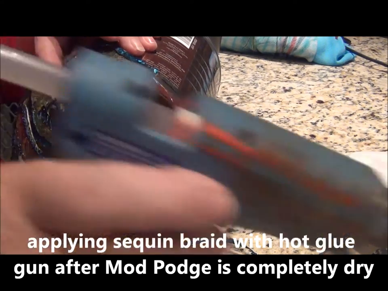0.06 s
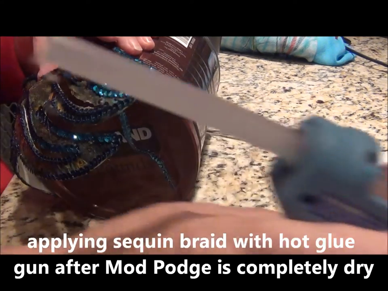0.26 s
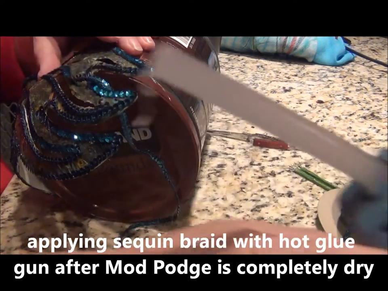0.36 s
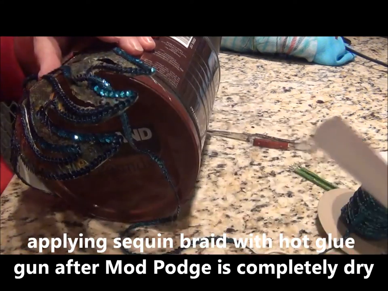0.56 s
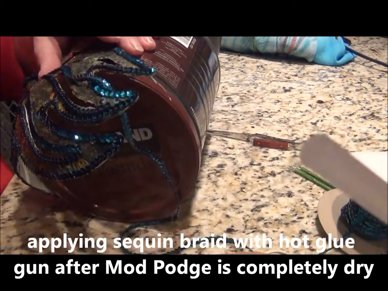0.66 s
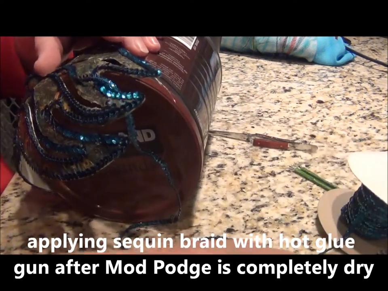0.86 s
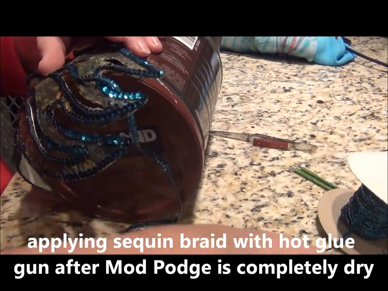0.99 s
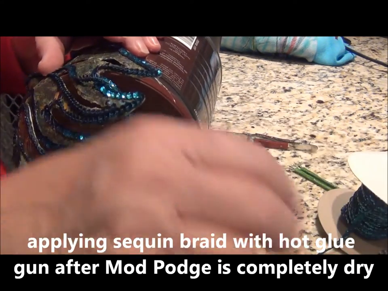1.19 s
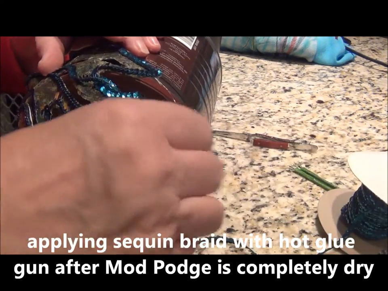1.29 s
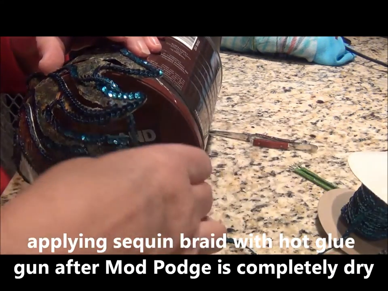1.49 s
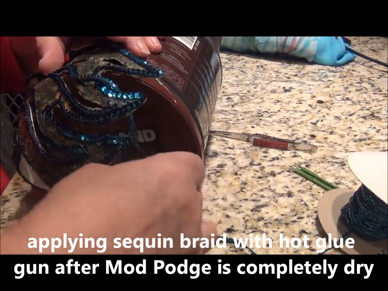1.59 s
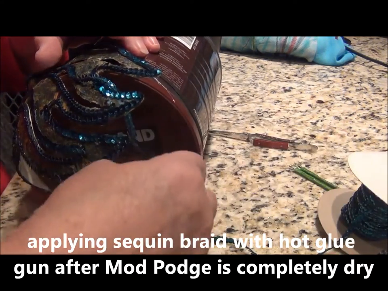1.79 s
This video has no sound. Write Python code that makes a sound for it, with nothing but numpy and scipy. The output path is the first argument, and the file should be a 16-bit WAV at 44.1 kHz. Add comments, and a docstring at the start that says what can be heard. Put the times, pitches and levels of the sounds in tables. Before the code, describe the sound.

A plastic glue gun is put down on a stone counter, close by. It clacks lightly in the hand around 0.3 seconds, lands with one sharp, loud knock at 0.5 and slides briefly. A small metallic tick follows, then a shifted craft tub gives a quick cluster of softer knocks from 0.9 to 1.0. Afterwards only quiet room hiss remains, with a faint tick near 1.8.

```python
"""In a quiet kitchen, a plastic glue gun clacks in the hand, lands hard on a stone counter and slides.
A craft tub is then shifted and knocks on the counter, among small ticks and rubs. Each impact excites
a short burst of dense resonances and a few ringing modes; sliding friction gives grainy noise.
The room reverberates over a steady hiss. The camera's gain control turns down at the hardest blow
and stays down."""
import sys
import numpy as np
from scipy import signal
from scipy.fft import rfft, irfft, next_fast_len
from scipy.io import wavfile
from scipy.ndimage import uniform_filter1d, map_coordinates

SR = 44100
rng = np.random.default_rng(int(sys.argv[2]) if len(sys.argv) > 2 else 0)


def master_out(mix):
    """Clip the mix to full scale and print it as 16-bit PCM to the path in sys.argv[1]."""
    frames = np.transpose(np.atleast_2d(mix))
    ceiling = np.clip(frames, -1, 1)
    pcm = np.round(ceiling * 32767).astype(np.int16)
    wavfile.write(sys.argv[1], SR, pcm)


N = 81585


def amp(db):
    """Amplitude ratio of a level in decibels."""
    return 10 ** (np.asarray(db) / 20)


def unit(x):
    """Normalisation to an rms of 1."""
    return x / np.sqrt(np.mean(x ** 2) + 1e-20)


def along(points, hz):
    """Interpolation of (Hz, value) points on a logarithmic frequency axis."""
    point_hz, values = np.transpose(points)
    return np.interp(np.log(hz + 1), np.log(point_hz + 1), values)


def filtered(x, response):
    """Linear filtering: the spectrum is multiplied by a frequency response."""
    size = next_fast_len(N + SR // 2)
    return irfft(rfft(x, size) * response(np.fft.rfftfreq(size, 1 / SR)), size)[..., :N]


def tone(hz, bass_db, treble_db):
    """Shelving response in dB: bass and treble relative to a flat midrange."""
    return along([(400, bass_db), (1000, 0), (2800, 0), (6000, treble_db)], hz)


def add(track, start_s, sound):
    """Superposition of a sound on a track."""
    part = track[round(start_s * SR):][:len(sound)]
    part += sound[:len(part)]


CONTACT_HOLD = 0.133  # share of a contact's t60 (time to fall 60 dB) spent chattering at full strength
CRACK_DB, CRACK_HZ = -4.5, 3470  # the sharp first touch: a high-passed impulse


def strike(colour, t60, modes, size=16384):
    """Impact excitation: a crack and a dying burst, shaped by colour(hz) in dB, plus damped modes."""
    t, hz = np.arange(size) / SR, np.fft.rfftfreq(size, 1 / SR)
    fade = amp(-60 * np.maximum(0, t / t60 - CONTACT_HOLD))
    burst = rng.standard_normal(size) * fade
    for _ in range(4):  # even out the burst's spectrum
        spectrum = rfft(burst)
        burst = irfft(spectrum / (abs(spectrum) + 1e-12)) * np.minimum(1, 10 * fade)
    # a minimum-phase response keeps the attack sharp
    cepstrum = irfft(np.log(amp(colour(hz)) + 1e-6))
    cepstrum[1:size // 2] *= 2
    cepstrum[size // 2 + 1:] = 0
    body_response = np.exp(rfft(cepstrum))
    crack = amp(CRACK_DB) * 1j * hz / (1j * hz + CRACK_HZ)
    sound = unit(irfft((rfft(burst) + crack) * body_response))
    for mode_hz, db, ring_s in modes:
        ring = np.sin(2 * np.pi * mode_hz * t) * amp(-60 * t / ring_s) * (1 - np.exp(-t * mode_hz))
        sound = sound + amp(db + rng.normal()) * unit(ring)
    return unit(sound) * np.sqrt(.01 * SR / size)  # the energy of 10 ms at rms 1


def blows(contacts, body, modes):
    """Repeated impacts on one body: the point of excitation colours each blow."""
    out = np.zeros(N)
    for start_s, db, bass_db, treble_db, t60 in contacts:
        colour = lambda hz: along(body, hz) + tone(hz, bass_db, treble_db)
        add(out, start_s, amp(db) * strike(colour, t60, modes))
    return out


# Blows on the stone. Each row: start in seconds, level, bass and treble in dB, t60 in seconds.
LANDING_BLOWS = [(.4931, -8.5, -6, 3, 0.019), (.5405, -21.5, 18, -6, 0.033), (.5605, -34, 26.5, 9, 0.028)]
# Envelope of the dense resonances. Each row: frequency in Hz, relative level in dB.
LANDING_BODY = [(280, -29), (650, -4), (1050, 1.5), (1700, -7.5), (2200, -4), (4100, -6), (8300, -29.5),
                (11000, -24), (16000, -48)]
# Ringing modes. Each row: frequency in Hz, relative level in dB, t60 in seconds.
LANDING_MODES = [(406.4, -21.5, 0.22), (850, -18, 0.34), (1026, -6.5, 0.021), (1212, -8, 0.028),
                 (2040, -7, 0.064), (2740, -6, 0.035), (3522, -13.5, 0.045)]


def gun_landing():
    """Impact on stone: one hard blow and two weaker contacts excite the glue gun's modes."""
    return blows(LANDING_BLOWS, LANDING_BODY, LANDING_MODES)


# Clacks in the hand. Each row: start in seconds, level, bass and treble in dB, t60 in seconds.
GUN_CLACKS = [(.2308, -19.5, 1.5, 4, 0.025), (.2788, -26, -8, 15, 0.021), (.3148, -33.5, 4, 21.5, .012),
              (.3541, -30.5, -9, 19, 0.015)]
# Envelope of the gun's dense resonances. Each row: frequency in Hz, relative level in dB.
GUN_BODY = [(60, -18.5), (180, -9.5), (270, -5.5), (600, -4.5), (1100, -1), (2500, 4.5), (4000, -7),
            (6500, -23.5), (16000, -36.5)]
# Ringing modes. Each row: frequency in Hz, relative level in dB, t60 in seconds.
GUN_MODES = [(265.3, -15.5, 0.05), (396.7, -13, 0.31), (972, -14, 0.065), (2365, -14.5, 0.075)]


def gun_clacks():
    """Damped free vibration: the hand-held plastic gun rings briefly after each clack."""
    return blows(GUN_CLACKS, GUN_BODY, GUN_MODES)


# Knocks of the tub. Each row: start in seconds, level, bass and treble in dB, t60 in seconds.
TUB_KNOCKS = [(.8913, -25.5, -9, 10, .014), (.8932, -21, 4, -2, 0.043), (.9147, -31, -2, -3, 0.018),
              (.9232, -22, 10, -15, 0.017), (.9461, -18.5, 8.5, 16.5, .005), (.9487, -18, -9, -3, 0.013),
              (.974, -31.5, -4, -11, .04)]
# Envelope of the tub's dense resonances. Each row: frequency in Hz, relative level in dB.
TUB_BODY = [(220, -15.5), (440, -2), (950, 1.5), (1170, -4), (1600, 1.5), (2400, -2.5), (3600, -10.5),
            (16000, -50.5)]
# Ringing modes. Each row: frequency in Hz, relative level in dB, t60 in seconds.
TUB_MODES = [(414.5, -14.5, 0.12), (928, -4.5, 0.23), (1046, -10, 0.03)]


def tub_knocks():
    """Superposed decays: the shifted tub knocks again before its modes have died away."""
    return blows(TUB_KNOCKS, TUB_BODY, TUB_MODES)


# The closing tap. Its row: start in seconds, level, bass and treble in dB, t60 in seconds.
LAST_TAP = [(1.0283, -21.5, 0, 0, 0.02)]
# Envelope of the tap's dense resonances. Each row: frequency in Hz, relative level in dB.
TAP_BODY = [(290, -16), (480, -0.5), (1500, 0), (3600, -1.5), (4500, -14.5), (9000, -36)]
# Ringing modes. Each row: frequency in Hz, relative level in dB, t60 in seconds.
TAP_MODES = [(1002, -10.5, 0.1), (1287, -10.5, 0.18), (3490, -27, 0.035)]


def last_tap():
    """Modal decay: a single tap after the knocks leaves three modes ringing."""
    return blows(LAST_TAP, TAP_BODY, TAP_MODES)


# Light ticks. Each row: start in seconds, level in dB, pitch in Hz, width in octaves, t60 in seconds.
TICKS = [(.0845, -43, 12600, 0.23, 0.022), (0.2784, -32.5, 14000, 0.49, 0.028),
         (0.3684, -39.5, 12900, 0.57, .035), (0.8223, -36.5, 11400, .23, 0.0089),
         (0.8566, -27, 7600, 0.46, 0.035), (1.8422, -36.5, 6700, 0.62, 0.0055)]
# Response of what the ticks shake. Each row: frequency in Hz, relative level in dB.
TICK_BODY = [(300, -19), (2000, -2.5), (16000, -18)]


def ticks():
    """Treble resonance: light high clicks, including the bright edge of the gun's second clack."""
    out = np.zeros(N)
    for start_s, db, pitch_hz, octaves, t60 in TICKS:
        peak = lambda hz: np.exp(-.5 * (np.log2((hz + 1) / pitch_hz) / octaves) ** 2)
        colour = lambda hz: 20 * np.log10(amp(along(TICK_BODY, hz)) + peak(hz))
        add(out, start_s, amp(db) * strike(colour, t60, modes=[]))
    return out


# Thin metal rings. Each row: start in seconds, level in dB, frequency in Hz, t60 in seconds.
PINGS = [(.3695, -40, 12450, 0.071), (.3695, -35, 1340, 0.04), (.8567, -34.5, 2310, 0.21),
         (.8567, -42, 781, 0.18)]


def pings():
    """Exponential decay: two of the ticks leave thin metal ringing in damped sinusoids."""
    out, t = np.zeros(N), np.arange(SR // 2) / SR
    for start_s, db, hz, t60 in PINGS:
        add(out, start_s, amp(db - 60 * t / t60) * np.sqrt(2) * np.sin(2 * np.pi * hz * t))
    return out


GRAIN_DB, GRAIN_PER_S = 3.5, 700  # depth and rate of the random flutter in level


def stroke(peak_s, db, rise_s, fall_s, colour):
    """Amplitude modulation: grainy noise swells 20 dB over its rise and sinks 20 dB over its fall."""
    t = np.arange(N) / SR
    noise = unit(filtered(rng.standard_normal(N), lambda hz: amp(colour(hz))))
    grain = map_coordinates(rng.standard_normal(N // 10), [t * GRAIN_PER_S])
    swell = amp(db - 20 * np.maximum((peak_s - t) / rise_s, (t - peak_s) / fall_s))
    return unit(noise * amp(GRAIN_DB * grain)) * swell


# Slides. Each row: peak time in seconds, level in dB, rise and fall in seconds, bass and treble in dB.
RUBS = [(.26, -33.5, 0.053, 0.044, 5, 8), (.542, -27, 0.016, 0.028, 0.5, -2.5),
        (0.741, -30, 0.044, 0.046, -3.5, -8.5), (.936, -29, 0.085, 0.042, -1, -3)]
# Spectrum of the slides. Each row: frequency in Hz, relative level in dB.
RUB_SPECTRUM = [(50, -2), (400, 5.5), (2150, -5.5), (2400, 6.5), (2700, -1.5), (5400, -4), (16000, -13.5)]
# Light brushes. Each row: peak time in seconds, level in dB, rise and fall in seconds, pitch in Hz.
BRUSHES = [(.265, -36.5, 0.058, 0.038, 10600), (.728, -37.5, .1, 0.11, 7000),
           (1.235, -46, .043, 0.12, 12000)]
BRUSH_PEAK_DB, BRUSH_OCTAVES = 10, 0.24


def friction():
    """Sliding friction: rubs on the counter give broadband noise; brushes hiss around one pitch."""
    out = np.zeros(N)
    for peak_s, db, rise_s, fall_s, bass_db, treble_db in RUBS:
        colour = lambda hz: along(RUB_SPECTRUM, hz) + tone(hz, bass_db, treble_db)
        out += stroke(peak_s, db, rise_s, fall_s, colour)
    for peak_s, db, rise_s, fall_s, pitch_hz in BRUSHES:
        colour = lambda hz: BRUSH_PEAK_DB / (1 + (np.log2((hz + 1) / pitch_hz) / BRUSH_OCTAVES) ** 2)
        out += stroke(peak_s, db, rise_s, fall_s, colour)
    return out


SCATTER_S, SCATTER_DB, SCATTER_HZ = 0.0021, -7, 4500


def scattered(x):
    """Scattering: clutter on the counter reflects the treble unequally to the two sides."""
    echoes = unit(rng.standard_normal(round(SCATTER_S * SR)))
    side = signal.fftconvolve(x, echoes / np.sqrt(len(echoes)))[:N]
    side = filtered(side, lambda hz: amp(SCATTER_DB) * hz / np.hypot(hz, SCATTER_HZ))
    return np.array([x + side, x - side])


def panned(x, right_db, shadow_hz=545):
    """Acoustic shadow: the camera body shades the far microphone, while the bass stays centred."""
    side_db = np.array([[-.5], [.5]]) * right_db
    return filtered(x, lambda hz: amp(side_db * hz ** 2 / (hz ** 2 + shadow_hz ** 2)))


def spread(pair, correlation):
    """Partial coherence: two independent noises mix to a given left-right correlation."""
    angle = lambda hz: np.arccos(np.clip(along(correlation, hz), -1, 1)) / 2
    mid, side = filtered(pair, lambda hz: np.array([np.cos(angle(hz)), np.sin(angle(hz))]))
    return np.array([mid + side, mid - side])


# Reverberation time. Each row: frequency in Hz, t60 in seconds.
ROOM_T60 = [(300, 0.26), (1400, 0.45), (2800, 0.35)]
# Strength of the reverberation. Each row: frequency in Hz, gain in dB.
ROOM_DB = [(450, -3), (900, -3), (1500, -4.5), (2800, -7)]
# Coherence of the reverberation. Each row: frequency in Hz, left-right correlation.
ROOM_CORRELATION = [(500, 0.96), (1500, 0.88), (10000, 0.56)]
ROOM_BUILD_S = 0.0013


def reverberation(x):
    """Diffuse field: the kitchen answers with decaying noise that lasts longest in the midrange."""
    hz, t, spectra = signal.stft(rng.standard_normal((2, N)), SR, nperseg=256)
    t60 = along(ROOM_T60, hz)[:, None]
    decay = amp(along(ROOM_DB, hz)[:, None] - 60 * t / t60)
    decay *= np.sqrt(2 * np.log(1000) / (t60 * SR))  # makes the energy independent of t60
    tail = signal.istft(spectra * decay, SR, nperseg=256)[1][:, :N]
    build_up = 1 - np.exp(-(np.arange(N) / SR / ROOM_BUILD_S) ** 2)
    return signal.fftconvolve(x[None], spread(tail, ROOM_CORRELATION) * build_up, axes=1)[:, :N]


# Spectrum of the hiss and rumble. Each row: frequency in Hz, relative level in dB.
FLOOR_SPECTRUM = [(25, -19.5), (90, -6.5), (270, -8.5), (600, -12.5), (1300, -12), (2300, -18),
                  (15500, -23.5)]
# Coherence of that noise. Each row: frequency in Hz, left-right correlation.
FLOOR_CORRELATION = [(200, 0.94), (1500, 0.081), (6000, 0.75)]
# Thin appliance whine. Its row: frequency in Hz, level in dB.
WHINE = [(15735, -64.5)]
FLOOR_DB = -44.5


def background():
    """Stationary noise: hiss and room rumble, with the faint pure tone of an appliance."""
    t = np.arange(N) / SR
    noise = spread(rng.standard_normal((2, N)), FLOOR_CORRELATION)
    hiss = unit(filtered(noise, lambda hz: amp(along(FLOOR_SPECTRUM, hz))))
    whine = sum(amp(db) * np.sqrt(2) * np.sin(2 * np.pi * (hz * t + rng.random())) for hz, db in WHINE)
    return amp(FLOOR_DB) * hiss + whine


def scene():
    """Superposition: each source reaches the microphones directly and through the room."""
    # each source with its right-minus-left treble level in dB
    sources = [(gun_clacks(), 3.3), (gun_landing(), 4.8), (tub_knocks(), 4), (last_tap(), 4),
               (ticks() + pings() + friction(), 2.5)]
    mix = background()
    for sound, right_db in sources:
        mix += panned(scattered(sound), right_db) + panned(reverberation(sound), right_db=1.5)
    return mix


CEILING_DB, LOOK_AHEAD_S, GAIN_RAMP_S = -13.5, 0.029, .01
TOP_HZ = 15900


def record(dry):
    """Automatic gain control: the gain drops just ahead of the loudest blow and holds; then a low-pass."""
    power = uniform_filter1d(np.mean(dry ** 2, axis=0), SR // 100)  # 10 ms average
    level = np.sqrt(abs(power) + 1e-12)
    held = np.minimum.accumulate(np.minimum(1, amp(CEILING_DB) / level))
    ahead = np.interp(np.arange(N) + LOOK_AHEAD_S * SR, np.arange(N), held)
    gain = uniform_filter1d(ahead, round(GAIN_RAMP_S * SR))
    return filtered(dry * gain, lambda hz: 1 / np.sqrt(1 + (hz / TOP_HZ) ** 200))


dry = scene()
out = record(dry)
master_out(out)
```